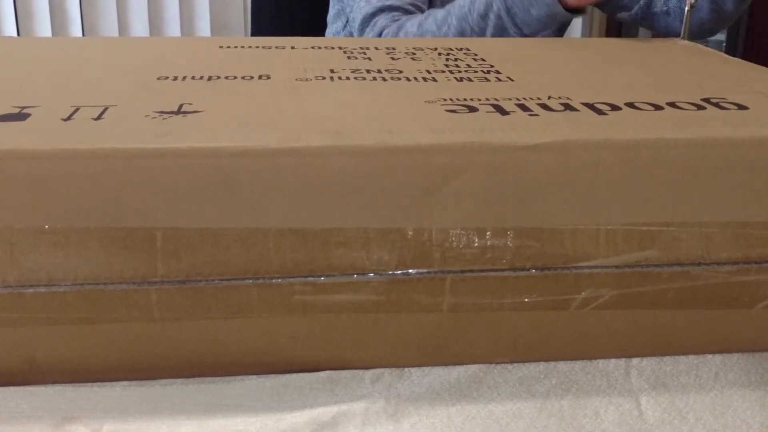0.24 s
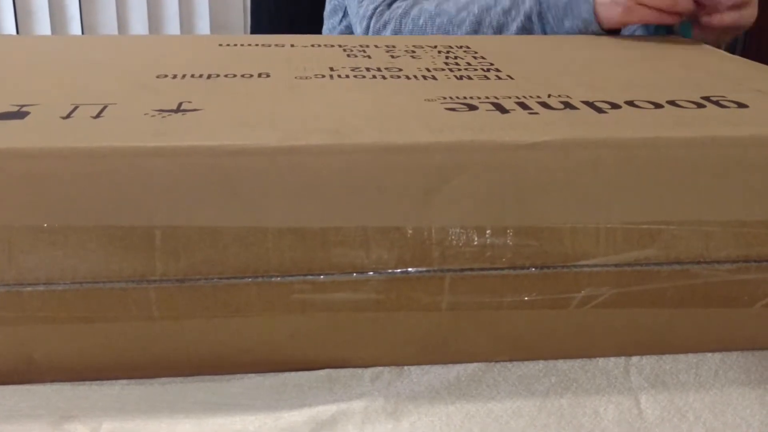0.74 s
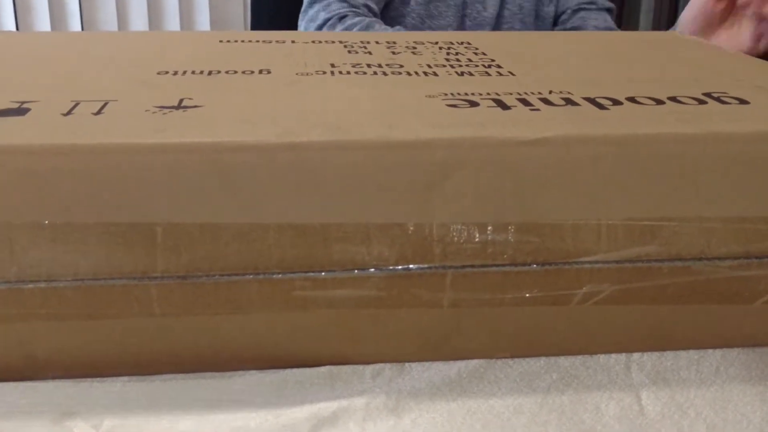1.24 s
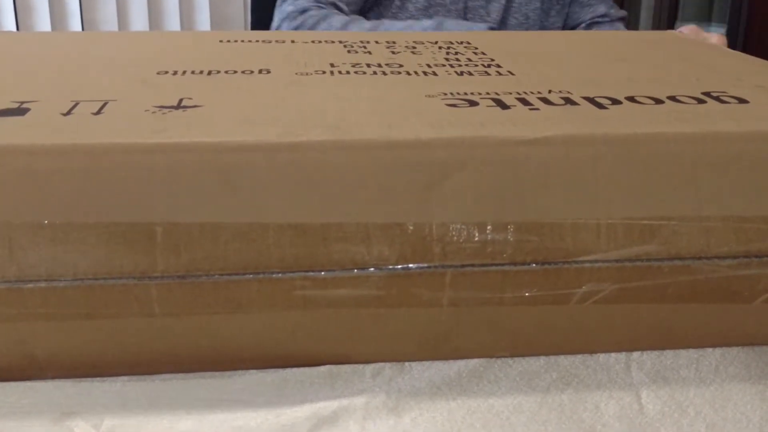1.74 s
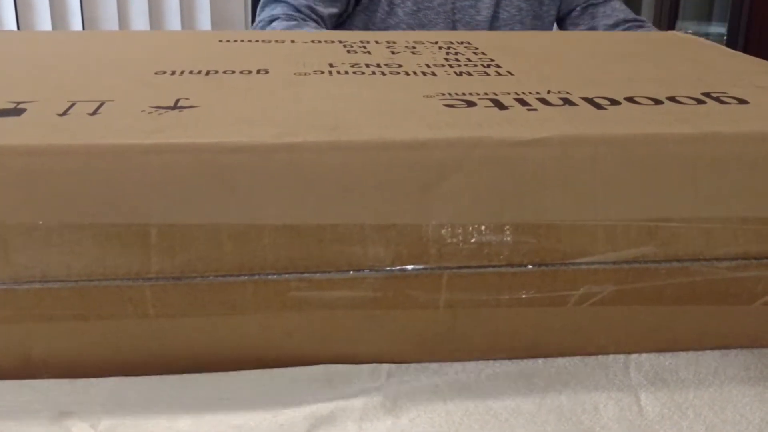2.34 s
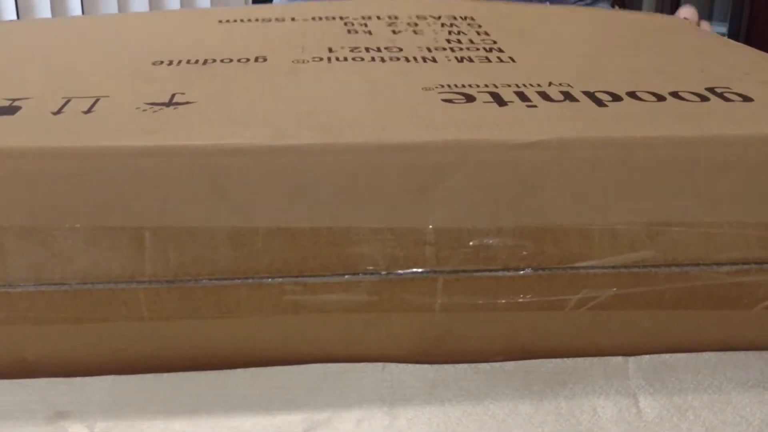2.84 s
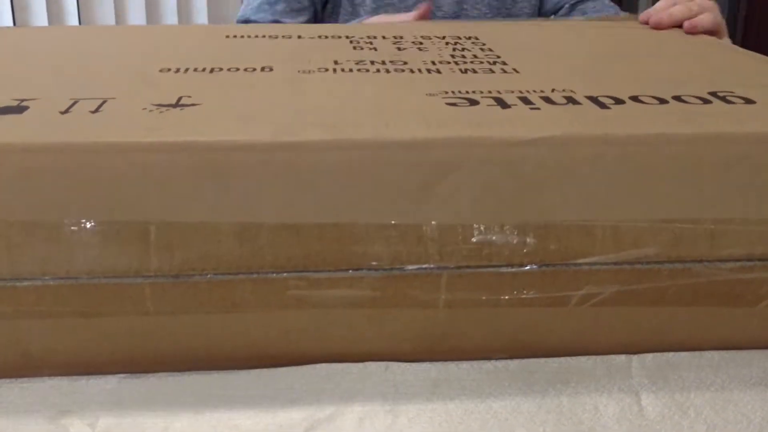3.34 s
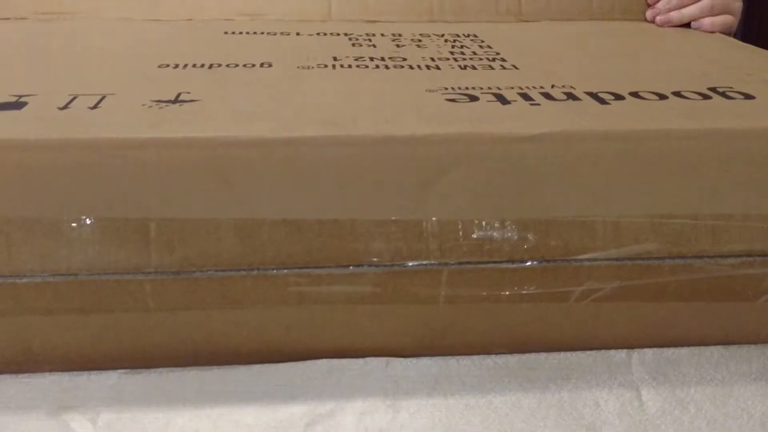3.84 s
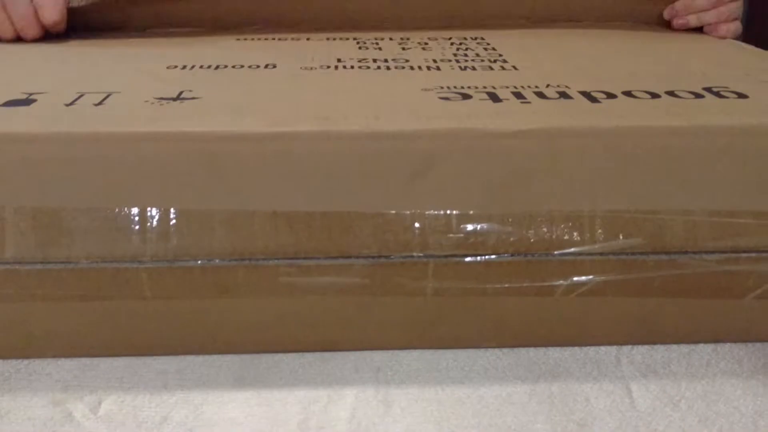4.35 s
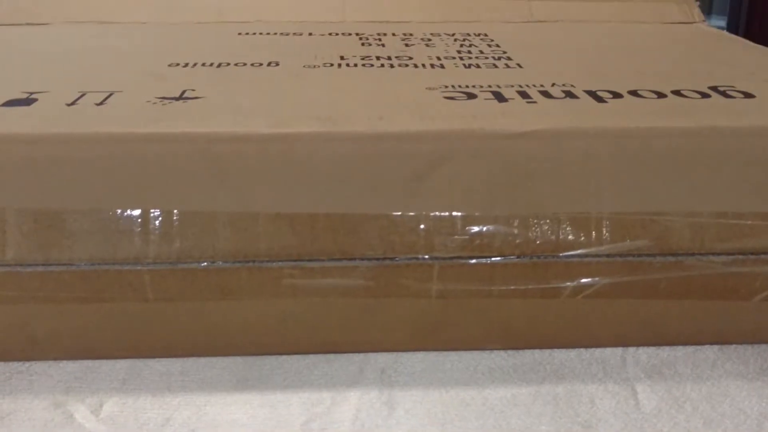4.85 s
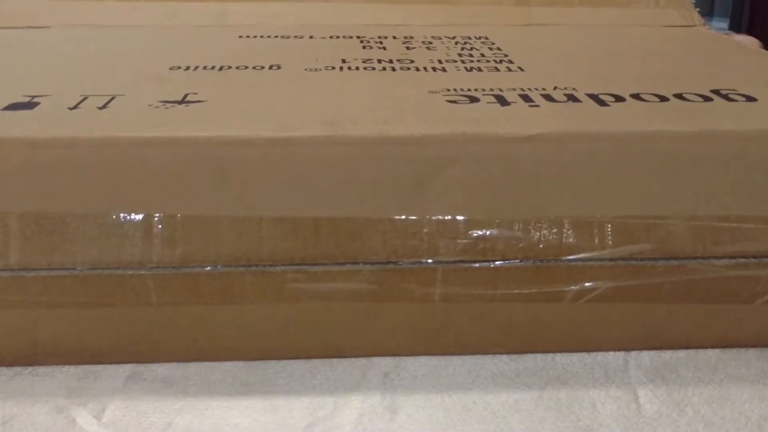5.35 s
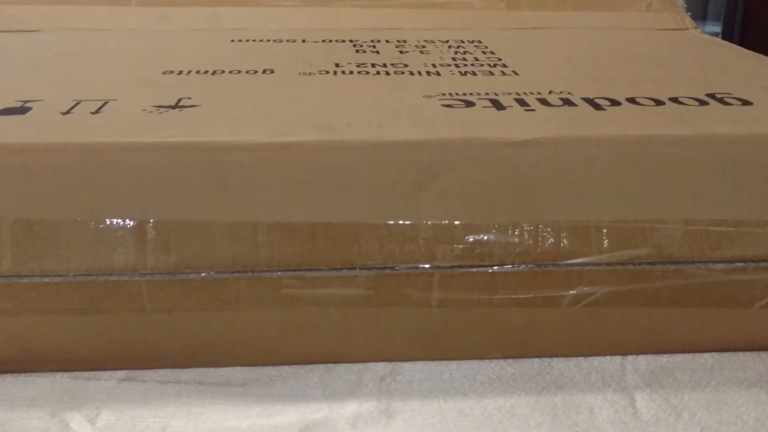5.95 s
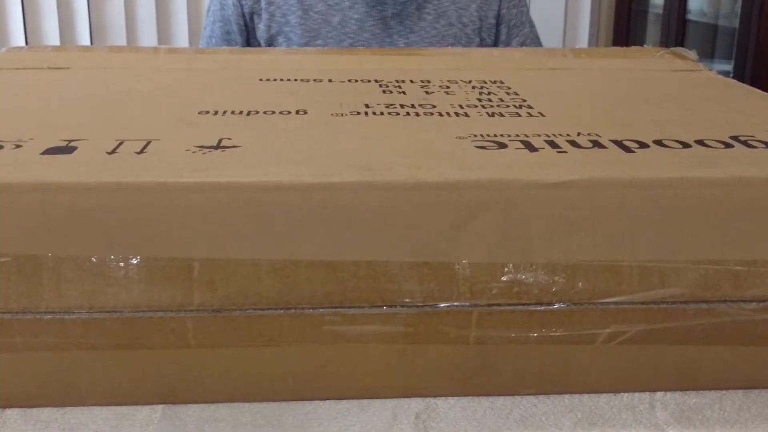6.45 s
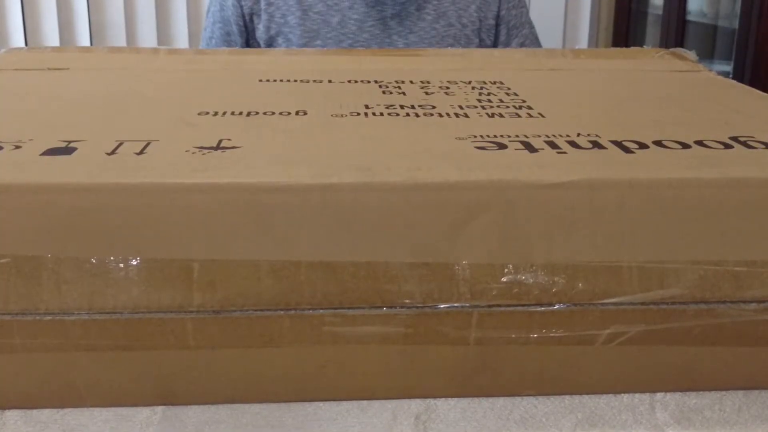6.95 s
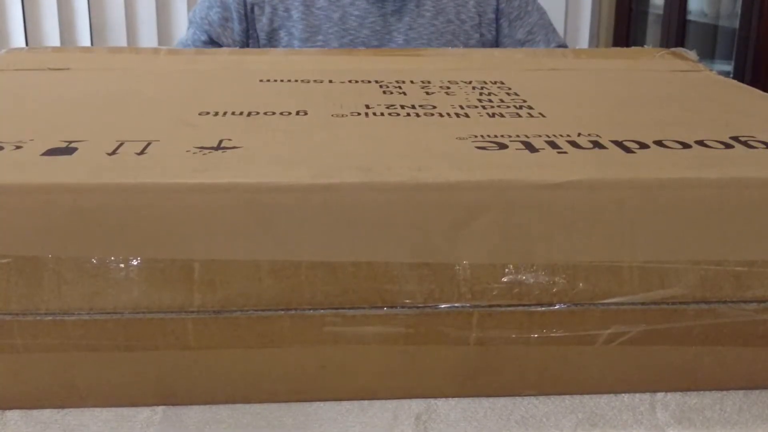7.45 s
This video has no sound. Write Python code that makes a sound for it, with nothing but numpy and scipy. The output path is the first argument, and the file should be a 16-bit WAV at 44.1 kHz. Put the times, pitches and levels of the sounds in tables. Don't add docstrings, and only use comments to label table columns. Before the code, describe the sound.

A cutter is dragged and dropped clattering on a table, then a taped cardboard box is pushed, knocked and ripped open close by.

```python
import sys
import numpy as np
from scipy import signal
from scipy.fft import rfft, irfft, next_fast_len
from scipy.io import wavfile
from scipy.ndimage import uniform_filter1d, map_coordinates

SR = 44100
rng = np.random.default_rng(int(sys.argv[2]) if len(sys.argv) > 2 else 0)


def persist_wave(psi):
    counts = np.round(np.clip(psi, -1, 1) * 32767).astype(np.int16)
    wavfile.write(sys.argv[1], SR, np.atleast_2d(counts).T)


def undo_db(level):
    steps = np.asarray(level, float) / 20
    return 10 ** steps


N = 339129

# time in seconds, level in dB.
GAIN_LIFT = [(0, -41), (.35, -48.5), (.8, -47), (1.2, -62), (1.7, -61.5), (2.3, -55), (3.5, -47.5),
             (3.8, -81.5), (4.8, -51), (5.6, -44), (6.2, -48.5), (6.3, -44.5), (7.2, -45), (7.69, -40.5)]
# frequency in Hz, level in dB per Hz.
AIR_SPECTRUM = [(25, -9.5), (70, -10.5), (150, -0.5), (500, -1), (1150, -3.5), (1350, -12.5), (3100, -8.5),
                (3400, -18.5), (6000, -18.5), (10000, -24), (15000, -27), (16500, -56.5)]
# frequency in Hz, width in Hz, level in dB.
FAR_RATTLE = [(780, 16, -50.5), (1410, 18, -48)]
# frequency in Hz, left level in dB, right level in dB.
WHINE_TONES = [(3000, -70, -70), (4000, -75, -75), (5001, -68, -72), (6002, -71, -58), (7000, -66, -69),
               (7640, -74, -78), (8336, -73, -71), (9001, -72, -74), (10002, -69, -73), (11000, -80, -80),
               (12000, -80, -78), (14002, -80, -77)]
WHINE_EVERY_S, WHINE_PAUSE_S, WHINE_FIRST_S = .08, .013, .014

# frequency in Hz, t60 in seconds.
ROOM_T60 = [(150, 0.42), (600, 0.37), (2000, 0.31), (6000, 0.31), (14000, 0.9)]
# frequency in Hz, level in dB.
WALL_COLOUR = [(100, 2.5), (6000, 1), (9000, -13), (15000, -14)]

# frequency in Hz, width in Hz, level in dB.
BOX_WALLS = [(129, 11, -4.5), (188.6, 28, -6.5), (255, 40, -2), (350, 17, -8)]
# start in seconds, length in seconds, first Hz, last Hz, peak in dB.
GROAN_EVENTS = [
    (2.26, .13, 592, 588, -44.5),
    (0.834, 0.61, 335, 337, -45),
    (1.566, 0.13, 427.5, 400, -52),
    (3.083, .08, 158.3, 127.6, -34),
    (3.222, 0.033, 229, 269, -31.5),
    (3.307, 0.083, 150.6, 131, -32.5),
    (3.53, 0.11, 165, 131.8, -24.5),
    (5.714, 0.096, 203, 207.4, -39),
    (6.163, 0.038, 207, 202.7, -35),
    (7.485, 0.084, 212, 198, -37),
]
# start in seconds, swell in seconds, hold in seconds, rub in dB,
# lightness in dB (more hiss, less boom).
HAND_STROKES = [(.3, 0.15, 0.1, -38.5, -2.5), (.59, 0.0046, 0.12, -41, 0.5), (1.8, 0.11, 0.11, -63.5, 10.5),
                (2.1, .01, 0.11, -58, -4), (2.23, 0.036, 0.053, -50, 1.8), (2.4, 0.1, 0.02, -39, 0),
                (2.69, 0.013, 0.027, -47.5, 4), (2.84, 0.012, 0.28, -44, 3.5),
                (3.12, 0.064, 0.19, -39, 0.5), (3.45, 0.047, 0.14, -43.5, -2), (3.66, .01, 0.1, -51, 1),
                (3.85, .01, 0.42, -54.5, -4), (4.01, 0.017, .22, -47, 0.5), (4.27, 0.097, .24, -46, 1),
                (4.85, 0.034, 0.33, -52.5, -0.5), (5.135, 0.062, 0.16, -36, 7),
                (5.31, 0.044, 0.016, -27.5, 4.5), (5.5, 0.017, 0.43, -52, 0.5),
                (6.006, 0.01805, 0.026, -32.5, 0), (6.12, .08, .02, -33.5, -2.5),
                (7.24, 0.056, 0.015, -45, -1), (7.34, 0.042, 0.12, -48, 1.5), (7.55, 0.11, .03, -35, -2)]
SWELL_DB, FADE_DB_PER_S, BOOM_DB, BOOM_SHRINKS = 14, 130, -7, 3.5
# frequency in Hz, level in dB per Hz.
RUB_SPECTRUM = [(120, -57), (200, -8.5), (443, -2), (673, -0.5), (1090, -2.5), (1810, -3), (1930, -1),
                (2340, -39), (2600, -61.5), (3380, -45), (5720, -120)]
# frequency in Hz, level in dB per Hz.
HISS_SPECTRUM = [(1500, -11.5), (2200, -6.5), (3700, -0.5), (4700, -0.5), (5700, -4), (7500, -7),
                 (10000, -10), (14000, -14.5), (16000, -18)]
# start in seconds, length in seconds, hiss in dB.
TAPE_RIPS = [
    (2.832, 0.091, -38.5),
    (3.529, .1, -31.5),
    (3.845, 0.02, -48.5),
    (4.493, 0.058, -43),
    (5.63, 0.14, -44),
]
# frequency in Hz, level in dB per Hz.
RIP_SPECTRUM = [(1500, -3.5), (3000, -4.5), (6000, 0), (9000, -8), (13000, -7), (16000, -12)]
RIP_SWELL_S, RIP_FADE_DB_PER_S = 0.0073, 600.5
STEP = 16

# time in seconds, peak in dB, centre in Hz.
TAPE_TICKS = [(0.3063, -33, 5300), (0.42, -37, 3820), (0.4758, -22, 3740), (0.477, -29, 4050),
              (2.6229, -25, 3880), (2.7993, -45, 3770), (2.831, -30, 5860), (2.8416, -20, 5460),
              (2.8465, -17, 5530), (2.8528, -21.5, 7720), (2.873, -21, 6300), (2.889, -22, 3720),
              (2.8894, -20, 7500), (2.911, -33.5, 3610), (2.8172, -43, 3350), (3.3064, -27, 7500),
              (3.4006, -39.5, 3670), (3.476, -33, 10100), (3.529, -32, 8000), (3.539, -32, 5590),
              (3.6252, -23, 6300), (3.6327, 0, 4700), (3.642, -25.5, 6000), (4.027, -31, 5630),
              (4.0725, -27.5, 6330), (4.1803, -32.5, 5200), (4.2952, -35, 11000), (4.361, -20, 5200),
              (4.275, -37, 11000), (4.3947, -37, 3560), (4.8139, -40.5, 6000), (5.016, -27, 3950),
              (6.0217, -31, 5270), (6.4099, -39.5, 5950), (6.4252, -41, 5990), (6.5077, -41.5, 8500),
              (7.0728, -41, 8400), (7.1079, -37.5, 6020), (7.137, -28, 5800), (7.09, -48, 7000),
              (7.122, -45, 7000)]
# time in seconds, peak in dB.
TAPE_SETTLES = [
    (5.8525, -38),
    (5.883, -36.5),
    (5.9419, -37.5),
    (6.9057, -40),
    (6.9737, -40),
    (6.986, -39),
]
SETTLE_HZ = 9030
# time in seconds, peak in dB, centre in Hz, bright crack in relative dB, t60 in seconds.
FLAP_KNOCKS = [(2.427, -40, 729, -11, .06), (2.496, -27.5, 901, 1.5, 0.073), (2.596, -35.5, 650, -15, .06),
               (2.705, -37.5, 512, 7, 0.29), (2.922, -28.5, 980, -11.5, 0.066),
               (2.947, -22.5, 1373, 4.5, 0.11), (2.958, -24.5, 812, 6, 0.14), (3.211, -23, 902, -2.5, .05),
               (3.2163, -13.5, 1030, -15, 0.053), (3.6272, -6.5, 1187, -3, 0.02),
               (3.6313, -15, 1000, -4, .039), (3.849, -34.5, 1700, -15.5, .07), (3.865, -32, 544, -2, 0.12),
               (3.935, -32, 686, -13, .041), (4.004, -31.5, 560, -11.5, .06),
               (4.071, -37, 498.4, -13, 0.056), (4.093, -32, 504, -13.5, .057), (4.151, -30, 529, -17, .05),
               (4.178, -36, 841, -20, .05), (4.281, -35.5, 664, -15.5, .05), (4.219, -35, 903, -19, .06),
               (4.237, -24, 662, -22, 0.1), (4.369, -34, 680, -3, 0.064), (4.514, -31, 682, -12.5, .2),
               (4.612, -37.5, 560, 0, 0.047), (4.86, -32, 1142, -26, 0.19), (5.087, -32, 631, -16, 0.4),
               (5.338, -24, 690, -21.5, 0.05), (5.3595, -7, 720, -20, 0.1), (5.364, -9, 911, -20.5, 0.059),
               (5.378, -12, 553, -20, 0.19), (5.395, -19, 550, -1.5, .2), (5.721, -34, 693, -16, 0.13),
               (6.012, -30, 657, -19, 0.075), (6.098, -15, 700, -25, 0.023), (6.117, -29, 698, -11.5, .04),
               (7.262, -24.5, 1730, -12.5, .03), (7.295, -32.5, 1200, -14.5, 0.039),
               (7.483, -24.5, 1000, -21.5, .04), (7.418, -29, 585.5, -18, 0.11),
               (7.584, -45, 707, -12.5, .1)]
KNOCK_THUD_DB, KNOCK_THUD_SHRINKS = -21.5, 0.34
SNAP_DB, SNAP_HZ = -10, 4060
# time in seconds, peak in dB, low thud in relative dB,
# bright crack in relative dB.
PALM_THUMPS = [(2.4957, -22, 1, 3.5), (3.306, -29, -24.5, -8), (3.32, -23, -1.5, 7.5),
               (3.345, -31, -5, -10.5), (3.532, -33.5, 8.5, -5.5), (3.98, -43, -5.5, -29.5),
               (4.456, -32, -13, -17.5), (5.333, -20.5, -24.5, -21.5), (6.155, -26, 1.5, -14.5),
               (6.2065, -18.5, -4, -12), (7.263, -29, -14, -12), (7.386, -30.5, -22.5, -18),
               (7.484, -20.5, 4.5, -36), (7.502, -32.5, -2.5, -25), (7.522, -42.5, -2.5, -25)]
THUMP_HZ, THUMP_T60_S = 308, 0.088

# time in seconds, peak in dB, centre in Hz, t60 in seconds.
SCUFF_EVENTS = [(.335, -36, 1050, 0.22), (.392, -41, 4000, .12), (.421, -24, 1151, 0.063),
                (.421, -32, 3810, 0.088), (0.5882, -25, 326, 0.055), (0.5887, -24.5, 3500, 0.23),
                (0.8972, -14.5, 3690, 0.11), (0.9056, -15, 5500, 0.13), (.975, -17.5, 1543, 0.073),
                (2.111, -25, 1050, 0.15), (2.098, -30.5, 3165, 0.11), (3.3067, -28, 4470, .02),
                (3.31, -21, 300, 0.027), (3.3246, -23, 1302, .04), (3.326, -25.5, 3680, .03),
                (3.329, -23, 6210, 0.2), (3.346, -28, 300, 0.026), (3.385, -35.5, 1502, .1),
                (3.459, -38, 300, .04), (3.852, -30, 6000, .02), (3.866, -31, 8000, .03),
                (3.982, -37.5, 421, .04), (4.218, -30.5, 850, 0.051), (4.247, -28, 421, 0.03),
                (4.393, -32.5, 1600, 0.025), (5.36, -17.5, 1035, 0.097), (.897, -3, 1460, .025),
                (.7965, -21, 6500, 0.11), (.462, -21, 780, 0.068), (0.4751, -13, 3960, .025),
                (.53, -21.5, 700, .05), (3.6335, -22.5, 13000, 0.0065), (7.264, -30, 326, 0.065),
                (7.645, -26, 720, .1), (7.667, -28, 720, 0.055), (7.684, -32.5, 3410, .04),
                (3.213, -18.5, 3570, .05), (2.95, -28, 3310, 0.087), (3.94, -37, 504, .05),
                (4.006, -35, 900, 0.043), (4.452, -31.5, 700, 0.042), (5.347, -27.5, 3610, .2),
                (.6, -31.5, 150, 0.1)]
SCUFF_RISE_S, SCUFF_WIDTH = 0.001, .45
JUDDER_S, JUDDER_EVERY_S, JUDDER_DB = 4.095, .0148, -37.5
JUDDER_HZ, JUDDER_T60_S = 900, 0.023
# frequency in Hz, level in dB, t60 in seconds.
TABLE_RING = [(527.3, 0, .25), (592, -2.5, .15), (1070, -7, .06), (1284, -12.5, .14), (1890, -26, .12)]
# frequency in Hz, level in dB, t60 in seconds.
CUTTER_RING = [(3007, 0.5, 0.15), (3494, -12, 0.14), (3720, -20, .15), (6471, -17.5, .12)]
# time in seconds, table level in dB, cutter level in dB.
RING_EVENTS = [
    (.7968, -19, -21),
    (1.8165, -37.5, -51),
    (2.099, -31.5, -47.5),
]

# time in seconds, peak in dB, contact in Hz, cutter ring in relative dB,
# cutter in Hz.
CUTTER_DROPS = [(.528, -25, 365, -22, 3590), (.589, -34.5, 374, -4.5, 3220), (0.6, -28, 657, 6, 3510),
                (0.7962, -6, 1703, 3, 2940), (.7972, -4, 600, 0, 2920), (.821, -16, 516, -8, 2970),
                (0.8958, -13.5, 1490, -4, 3640), (.8975, -6, 1400, 0.5, 3840), (0.9071, -6, 1790, 8, 2770),
                (0.9096, -14.5, 600, 8, 3750), (0.9172, -19.5, 705, 3.5, 3620), (.976, -20, 830, -1, 3076),
                (1.816, -22.5, 595, -20, 2940), (1.839, -30, 610, -29, 2700), (1.856, -35, 581, -10, 3540),
                (2.098, -16.5, 800, -20.5, 3070), (2.104, -20, 1300, -15, 3170)]
# time in seconds, peak in dB, contact in Hz,
# cutter ring in relative dB, cutter in Hz.
CUTTER_ROCKS = [
    (1.079, -31, 600, 1.5, 2970),
    (1.097, -24, 743, -11, 2930),
    (1.112, -35.5, 757, -25, 3000),
    (1.146, -29, 600, -14, 2980),
    (1.186, -25.5, 592, -18, 2950),
    (1.203, -28, 613, -20, 3000),
    (1.304, -37.5, 714, -32, 3300),
    (2.224, -37, 574, -19, 3000),
    (2.268, -47, 592, 8, 3740),
    (7.306, -40.5, 1190, 15.5, 2970),
]
# time in seconds, peak in dB, contact in Hz, cutter ring in relative dB.
CUTTER_DRAGS = [
    (0.386, -27.5, 1100, -19.5),
    (.408, -27.5, 1100, -21),
    (0.429, -20.5, 1090, -11.5),
    (.456, -21.5, 686, -19.5),
    (.515, -31, 500, -21.5),
    (.668, -34, 1250, -15),
    (.70, -28.5, 1250, -17.5),
]
# frequency in Hz, width in Hz, level in dB.
TABLE_TOP = [(531, 56, -3), (595, 65, 4), (720, 25, -9), (930, 24, -15), (1009, 27, -10), (1288, 50, -11),
             (1570, 160, -7.5), (1750, 84, -4), (1920, 120, -2), (2185, 200, 0.5)]
# frequency in Hz, width in Hz, level in dB.
TABLE_FRAME = [(340, 18, 5.5), (273.4, 13, 0), (143.3, 73, -10), (400, 47, -1.5)]
# frequency in Hz, width in Hz, level in dB.
CUTTER_BODY = [(2830, 280, -4), (2920, 160, -3.5), (2970, 45, 2.5), (3525, 50, -4), (3740, 50, -0.5),
               (4200, 220, -3.5), (5200, 770, -2), (6060, 400, -11.5), (6500, 290, -0.5)]
DRAG_RING_HZ, DRAG_RISE_S, DROP_RISE_S, ROCK_RISE_S = 3800, .01, .0002, 0.0028
HARD_DB, EDGE_DB, EDGE_HZ = -16, -15.5, 1300
TABLE_T60_S = 0.17
DRAG_THUD_DB, DRAG_THUD_PER_OCT = 8.5, 17
DROP_THUD_DB, DROP_THUD_SHRINKS = -24, 0.42

# frequency in Hz, lead in radians.
PORT_TURN = [(20, -3), (90, -2), (500, 0), (1200, 0.5), (1700, 1.18), (2300, 4), (3400, 5.5), (4700, 9.5),
             (7000, 16), (10300, 27.5), (16000, 36)]
# frequency in Hz, likeness from 0 to 1.
PORT_LIKENESS = [(50, 0.49), (300, 0.47), (1000, 1), (3500, 0.8), (6000, 0.35), (9000, 0.074),
                 (15000, 0.09)]
# start in seconds, end in seconds.
SILENCE = (6.213, 6.272)
LOUD_DB = -24
TOP_HZ = 16000

T = np.arange(8192) / SR


def unit(x):
    return x / np.sqrt(np.mean(x ** 2) + 1e-20)


def peak(x):
    return x / np.abs(x).max()


def along(points, hz):
    f, v = np.transpose(points)
    return np.interp(np.log(hz + 1), np.log(f + 1), v)


def wobble(rate):
    knots = rng.standard_normal(int(N * rate / SR) + 4)
    return map_coordinates(knots, [np.arange(N) * rate / SR])


def filtered(x, response):
    m = next_fast_len(x.shape[-1] + 8192)
    return irfft(rfft(x, m) * response(np.fft.rfftfreq(m, 1 / SR)), m)[..., :x.shape[-1]]


def resonant(modes):
    def response(f):
        return sum((-1) ** k * undo_db(db) * 1j * f * w / (c * c - f * f + 1j * f * w)
                   for k, (c, w, db) in enumerate(modes))
    return response


def nearest(modes, hz, fall_db):
    return [(c, w, db + rng.normal(0, 2) - fall_db * abs(np.log2(c / hz))) for c, w, db in modes]


def burst(t60, modes, rise=0.00018, top_hz=20000, kick=5, size=len(T)):
    t = T[:size]
    force = (1 - np.exp(-t / rise)) * undo_db(-60 * t / t60) * rng.standard_normal(size)
    force[:4] += kick * min(1, 0.00084 / rise)
    f = np.fft.rfftfreq(2 * size, 1 / SR)
    soft = 1 / (1 - (f / top_hz) ** 2 + 1.4j * f / top_hz) ** 2
    return peak(irfft(rfft(force, 2 * size) * resonant(modes)(f) * soft)[:size])


def add(out, s, sound):
    out[round(s * SR):][:len(sound)] += sound


def gain_lift():
    t = np.arange(N) / SR
    return undo_db(np.interp(t, *np.transpose(GAIN_LIFT)) + 0.27 * wobble(7.6))


def room_air(lift):
    t = np.arange(N) / SR
    air = unit(filtered(rng.standard_normal(N), lambda hz: undo_db(along(AIR_SPECTRUM, hz))))
    far = filtered(rng.standard_normal(N), resonant(FAR_RATTLE))
    return lift * air + undo_db(25.5 - 100 * np.maximum(t - .25, 0)) * far


def camera_whine(lift):
    t = np.arange(N) / SR
    running = uniform_filter1d(1.0 * ((t - WHINE_FIRST_S) % WHINE_EVERY_S > WHINE_PAUSE_S), size=132)
    whine = np.zeros((2, N))
    for hz, left_db, right_db in WHINE_TONES:
        tone = undo_db(49.5 + 1.5 * wobble(25)) * running * np.sin(2 * np.pi * (hz * t + rng.random()))
        whine += undo_db([[left_db], [right_db]]) * tone
    fade = undo_db(-40 * np.clip(t - 7.2, 0, .25))
    return lift * whine * fade * np.clip(lift / undo_db(-43.5), 0, 1) ** .5


def room(x):
    out, size = np.zeros(N + SR), SR // 4
    for start in range(0, N, size):
        hz, t, z = signal.stft(rng.standard_normal(SR // 2), SR, nperseg=256)
        tail_db = along(WALL_COLOUR, hz)[:, None] - 60 * t / along(ROOM_T60, hz)[:, None]
        tail = signal.istft(z * undo_db(tail_db), SR, nperseg=256)[1]
        wet = signal.fftconvolve(x[start:start + size], tail / np.linalg.norm(tail))
        out[start + 300:][:len(wet)] += wet
    return out[:N]


def groans():
    out, waver = np.zeros(N), wobble(40)
    for s, length, first_hz, last_hz, db in GROAN_EVENTS:
        u = np.arange(round(length * SR)) / (length * SR)
        hz = last_hz + (first_hz - last_hz) * np.exp(-3 * u)
        hum = np.sin(2 * np.pi * np.cumsum(hz) / SR)
        add(out, s, undo_db(db) * np.sin(np.pi * u ** 0.4) * hum)
    return out * undo_db(2.0 * waver)


def grit(spread_db, clump_db, clump_rate):
    size = undo_db(spread_db * np.minimum(rng.exponential(size=N), 6) + clump_db * wobble(clump_rate))
    return size * rng.standard_normal(N)


def stroke_db(start, swell, hold, fade):
    t = np.arange(0, N, STEP) / SR - start
    shape = np.minimum(SWELL_DB * np.minimum(t / swell - 1, 0), -fade * (t - swell - hold))
    return np.maximum(shape, -120)


def hands():
    shapes = np.array([stroke_db(s, swell, hold, FADE_DB_PER_S) + db for s, swell, hold, db, _ in HAND_STROKES])
    light_db = np.array(HAND_STROKES)[:, -1:]
    rips = [stroke_db(s, RIP_SWELL_S, length, RIP_FADE_DB_PER_S) + db for s, length, db in TAPE_RIPS]

    def level(shapes_db):
        return undo_db(np.repeat(np.max(shapes_db, axis=0), STEP)[:N])

    boom = unit(filtered(grit(3, 4.5, 30), resonant(BOX_WALLS)))
    rub = unit(filtered(grit(3.75, 3.85, 60), lambda hz: undo_db(along(RUB_SPECTRUM, hz))))
    hiss = unit(filtered(grit(2.77, 0.59, 120), lambda hz: undo_db(along(HISS_SPECTRUM, hz))))
    rip = unit(filtered(grit(1.2, 0.69, 140), lambda hz: undo_db(along(RIP_SPECTRUM, hz))))
    out = level(shapes + BOOM_DB - BOOM_SHRINKS * light_db) * boom
    out += level(shapes) * rub
    out += level(shapes + light_db) * hiss
    return out + level(rips) * rip


def blows():
    thumps = [(s, db, THUMP_HZ, low_db, crack_db, THUMP_T60_S) for s, db, low_db, crack_db in PALM_THUMPS]
    return thumps + [(s, db, hz, KNOCK_THUD_DB - KNOCK_THUD_SHRINKS * db, crack_db, t60)
                     for s, db, hz, crack_db, t60 in FLAP_KNOCKS]


def tape():
    out = np.zeros(N + SR)
    edges = [(s, db + ring_db + EDGE_DB, EDGE_HZ) for s, db, _, ring_db, _ in CUTTER_DROPS if db > HARD_DB]
    snaps = [(s, db + crack_db + SNAP_DB, SNAP_HZ) for s, db, _, _, crack_db, _ in blows()]
    settles = [(s, db, SETTLE_HZ) for s, db in TAPE_SETTLES]
    for s, db, hz in TAPE_TICKS + edges + snaps + settles:
        modes = [(hz, .35 * hz, 0), (12500, 8000, -12)]
        add(out, s, undo_db(db + 4) * burst(.004, modes, .00003, top_hz=3 * hz, kick=1.5, size=512))
    return out[:N]


def knocks():
    out = np.zeros(N + SR)
    for s, db, hz, low_db, crack_db, t60 in blows():
        flap = burst(t60, [(hz, 0.26 * hz, 0), (2.13 * hz, 0.72 * hz, -9)], 0.001, top_hz=2670, kick=4.33)
        boom = burst(.5 * t60, nearest(BOX_WALLS, 137, 0), 0.0021, top_hz=600, kick=13.0)
        crack = burst(0.41 * t60, [(3550, 5100, 4.5), (5900, 2000, 4.5), (11120, 5000, -11.0)])
        add(out, s, undo_db(db) * (flap + undo_db(low_db) * boom + undo_db(crack_db) * crack))
    return out[:N]


def scuffs():
    out = np.zeros(N + SR)
    judder = [(JUDDER_S + k * JUDDER_EVERY_S, JUDDER_DB, JUDDER_HZ, JUDDER_T60_S) for k in range(7)]
    for s, db, hz, t60 in SCUFF_EVENTS + judder:
        size = len(T) if t60 > .085 else len(T) // 2
        modes = [(hz, SCUFF_WIDTH * hz, 0)]
        add(out, s, undo_db(db) * burst(t60, modes, SCUFF_RISE_S, top_hz=2 * hz, kick=1.7, size=size))
    return out[:N]


def free_ringing():
    def ring(modes):
        return sum(undo_db(db + rng.normal(0, 2.9) - 60 * T / t60) * np.sin(2 * np.pi * hz * T)
                   for hz, db, t60 in modes)

    out = np.zeros(N + SR)
    for s, table_db, cutter_db in RING_EVENTS:
        add(out, s, undo_db(table_db) * ring(TABLE_RING) + undo_db(cutter_db) * ring(CUTTER_RING))
    return out[:N]


def cutter():
    out = np.zeros(N + SR)
    contacts = [(s, db, hz, DRAG_THUD_DB - DRAG_THUD_PER_OCT * np.log2(hz / 370), ring_db, DRAG_RING_HZ, DRAG_RISE_S)
                for s, db, hz, ring_db in CUTTER_DRAGS]
    for events, rise in [(CUTTER_DROPS, DROP_RISE_S), (CUTTER_ROCKS, ROCK_RISE_S)]:
        contacts += [(s, db, hz, DROP_THUD_DB - DROP_THUD_SHRINKS * db, ring_db, ring_hz, rise)
                     for s, db, hz, ring_db, ring_hz in events]
    for s, db, hz, low_db, ring_db, ring_hz, rise in contacts:
        top = burst(.25 * TABLE_T60_S, nearest(TABLE_TOP, hz, 6), rise, top_hz=2400, kick=12)
        tap = burst(0.48 * TABLE_T60_S, [(hz, .5 * hz, 0), (1400, 900, -5)], rise, top_hz=2780)
        wood = peak(top + 0.71 * tap)
        blade = burst(.02, nearest(CUTTER_BODY, ring_hz, 15), rise, top_hz=8500, kick=9)
        thud = burst(0.52 * TABLE_T60_S, TABLE_FRAME, rise, top_hz=767, kick=4.8)
        add(out, s, undo_db(db + 1.0) * (wood + undo_db(low_db) * thud + undo_db(ring_db) * blade))
    return out[:N]


def spread(x, direct, step=0.093, dip=0.19):
    z = signal.stft(x, nperseg=128)[2]
    field = uniform_filter1d(rng.standard_normal((2, *z.shape)), size=10, axis=2)
    other = signal.istft(z * np.exp(1j * np.arctan2(*field)), nperseg=128)[1][:N]
    other = other * np.std(x) / np.std(other)
    hz = np.fft.rfftfreq(next_fast_len(N + 8192), 1 / SR)
    turn = np.interp(hz, *np.transpose(PORT_TURN))
    alike = along(PORT_LIKENESS, hz) * (1 - dip * (hz > 1200) * np.sin(turn) ** 2)
    angle = np.arccos(np.clip(alike, 0, 1)) / 2
    sign = np.array([[-1], [1]])
    balance = undo_db(sign * along([(300, -0.47), (2000, 0.36), (12000, 1.0)], hz))
    ports = np.exp(.5j * sign * (turn - step * (hz > 1200) * np.sin(2 * turn))) * balance
    clicks = filtered(direct, lambda f: ports)
    shared = filtered(x, lambda f: ports * np.cos(angle))
    return clicks + shared + filtered(other, lambda f: (f > 150) * sign * ports * np.sin(angle))


def scene():
    table = cutter() + scuffs() + free_ringing()
    ticks = tape()
    box = knocks() + groans() + hands()
    lift = gain_lift()
    action = .5 * table + box + room(undo_db(-13.0) * table + undo_db(-18.5) * (box + ticks))
    action[round(SILENCE[1] * SR):round(6.4 * SR)] = 0
    return spread(action + room_air(lift), ticks + .5 * table) + camera_whine(lift)


def hollow(x):
    t = np.arange(N) / SR
    bare = (t < .33) | (t > SILENCE[1]) & (t < 7.26)
    calm = np.clip(2 - uniform_filter1d(np.abs(x.mean(0)), size=600) / undo_db(LOUD_DB), 0, 1)
    # centre in Hz, width in Hz, emptiness for near sounds, emptiness for bare air.
    bands = [(2200, 170, 1, -3), (2390, 170, 3.6, -4), (4580, 200, -6, 2), (11500, 400, -12, 4)]
    for centre_hz, width_hz, near, air in bands:
        band = filtered(x.mean(0), lambda hz: np.exp(-((hz - centre_hz) / width_hz) ** 6))
        x = x - band * calm * np.clip(4 * wobble(22) + np.where(bare, air, near), 0, 1)
    return x


def low_pass(x):
    return signal.sosfilt(signal.butter(12, 15970, fs=SR, output="sos"), x)


def record(dry):
    t = np.arange(N) / SR
    start, end = SILENCE
    fall_db = np.maximum(-24 - 3000 * (t - start) - 200 * (t > 6.245), -300)
    gate_db = np.where((t > start) & (t < end), fall_db, 0)
    tilt = [(30, 1.5), (100, -1.0), (130, 0.5), (14000, -1.5), (15500, -12.5)]  # (Hz, dB)
    heard = filtered(hollow(dry), lambda hz: undo_db(along(tilt, hz)) * (hz < TOP_HZ))
    mix = np.clip(heard * undo_db(gate_db), -1, 1)
    return low_pass(mix)


dry = scene()
out = record(dry)
persist_wave(out)
```